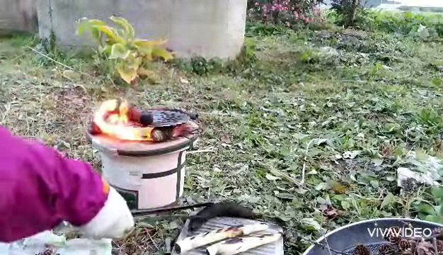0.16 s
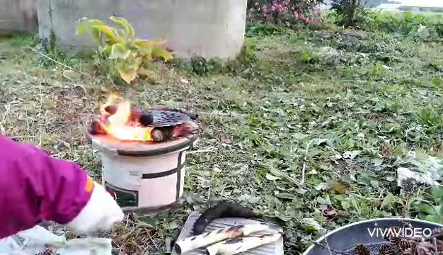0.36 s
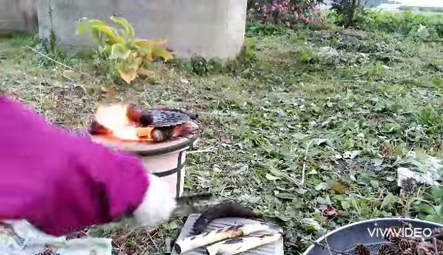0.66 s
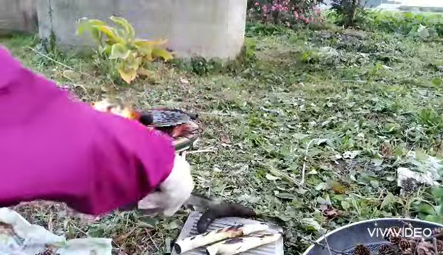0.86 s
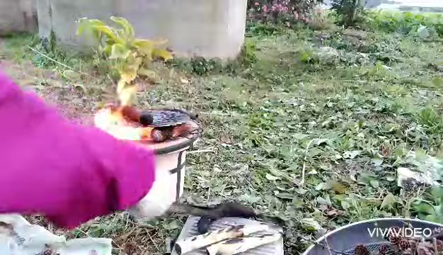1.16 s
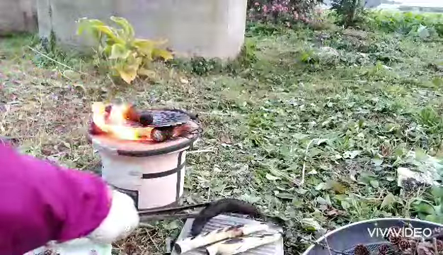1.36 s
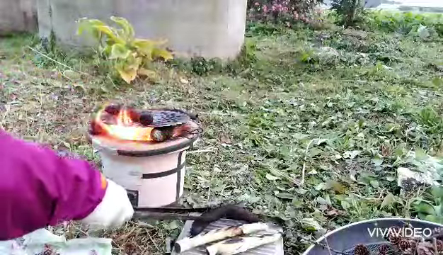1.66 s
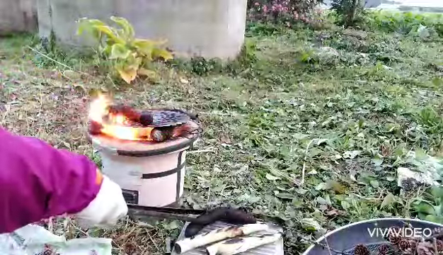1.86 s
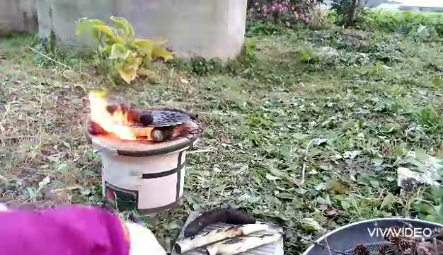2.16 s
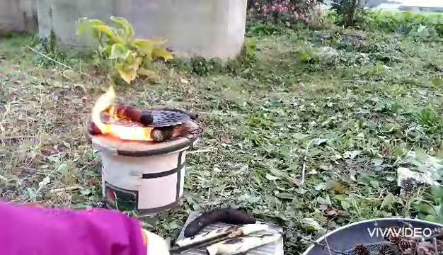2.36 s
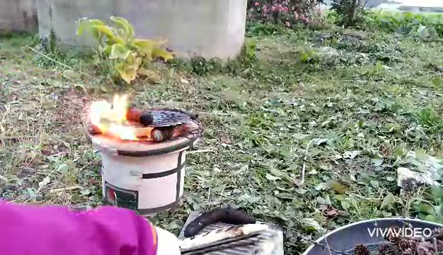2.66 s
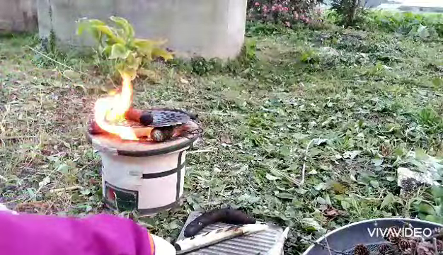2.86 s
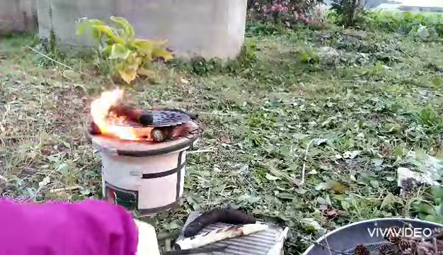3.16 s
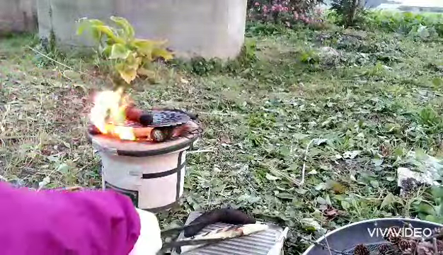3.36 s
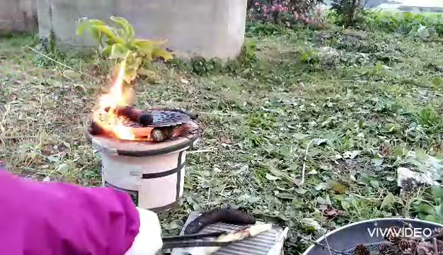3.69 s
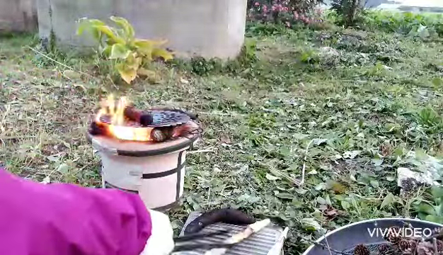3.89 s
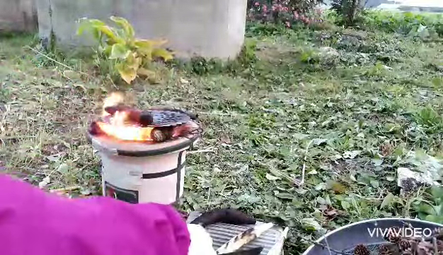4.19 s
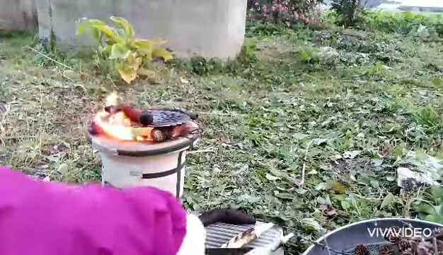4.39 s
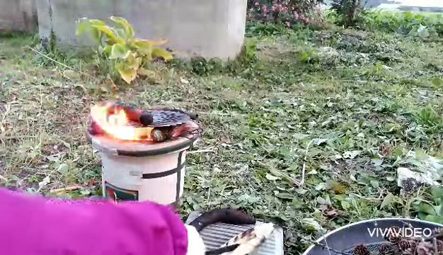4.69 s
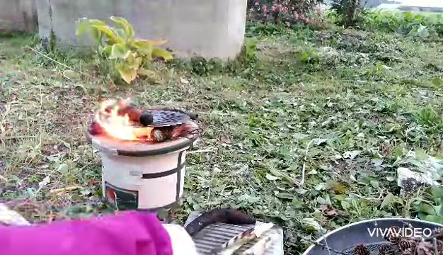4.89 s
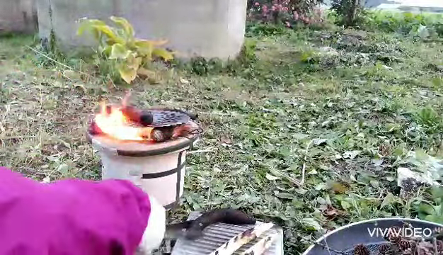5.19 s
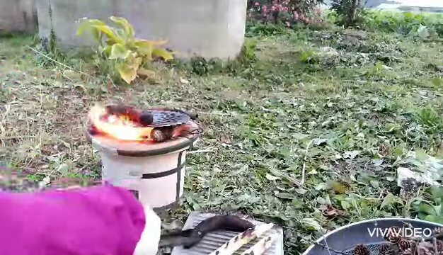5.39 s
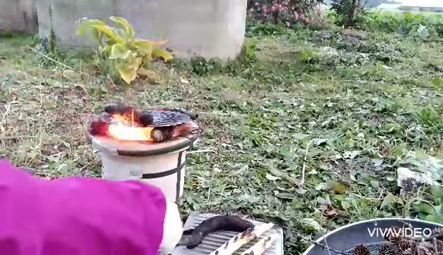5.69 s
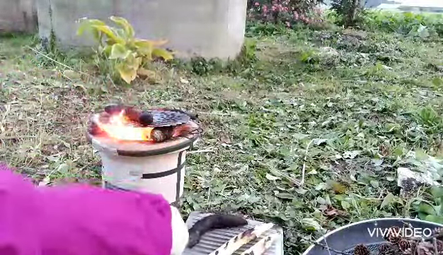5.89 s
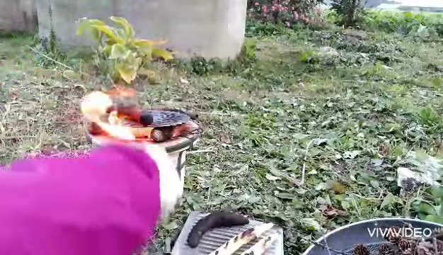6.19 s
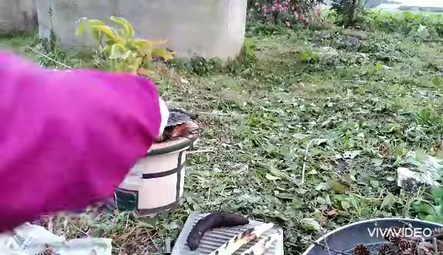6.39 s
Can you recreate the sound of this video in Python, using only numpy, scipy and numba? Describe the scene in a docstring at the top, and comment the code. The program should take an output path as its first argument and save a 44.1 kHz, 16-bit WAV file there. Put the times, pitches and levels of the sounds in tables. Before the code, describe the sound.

Outdoors in a garden, a nylon sleeve swishes as an arm moves, then steel tongs clink sharply. A cluster of rattling knocks and scrapes on a food-damped metal grate follows, then a bright double clink and the loudest clack near the middle. Smaller taps come later, with a last firm knock. Low flames flutter faintly and wood ticks. One phone microphone, close and dry, with dulled highest treble.

```python
"""Steel tongs turn food on a ridged metal grate in a garden, beside a small wood stove.
The tips knock, chatter and scrape on the grate, which the food damps; the arms clink: struck, decaying modes.
Shaped noise makes the low flames, the ticks of the wood and a nylon sleeve that swishes with each arm stroke.
A distant outdoor wash lies behind; one phone microphone hears it all through a limiter and a treble cut."""
import sys
import numpy as np
from scipy import signal
from scipy.fft import rfft, irfft, next_fast_len
from scipy.io import wavfile
from scipy.ndimage import uniform_filter1d, minimum_filter1d
from numba import njit

SR = 44100
rng = np.random.default_rng(int(sys.argv[2]) if len(sys.argv) > 2 else 0)


def pcm_store(signal):
    """Save signal as 16-bit PCM."""
    levels = np.round(np.clip(np.atleast_2d(signal), -1, 1) * 32767)
    wavfile.write(sys.argv[1], SR, levels.astype(np.int16).T)


N = 288458  # length in samples

# distant outdoor noise, relative spectrum: [f/Hz, density/dB per Hz]
GARDEN_SPECTRUM = [(200, -2), (320, -5), (600, -2.5), (930, 3.5), (1400, 1.5), (1800, -2.5), (2400, -12.5),
                   (3500, -19), (5300, -26.5), (6850, -17.5), (7800, -36), (11000, -44), (12300, -60.5)]
# low flutter of the flames, relative spectrum: [f/Hz, density/dB per Hz]
FLAME_SPECTRUM = [(20, -35), (33, -17), (45, -0.5), (58, 3), (80, 0.5), (108, -0.5), (140, -8), (200, -13),
                  (300, -19), (600, -79.5)]
# ticks of the burning wood: [t/s, peak level/dB]
WOOD_TICKS = [(2.268, -27), (4.5712, -33.5), (5.5595, -31.5), (6.1749, -36.5), (6.3579, -34)]
# nylon hiss, also the colour of the wood ticks, relative spectrum: [f/Hz, density/dB per Hz]
SWISH_SPECTRUM = [(500, -6), (900, -3), (1500, 1), (2100, -4), (3000, -4.5), (4000, -2.5), (5300, -4.5),
                  (6300, 1.5), (6900, 6), (7400, -8), (8000, -16.5), (9500, -23), (11200, -29),
                  (12300, -75)]
# strokes of the arm in its sleeve: [t of the fastest moment/s, length/s, level/dB]
ARM_STROKES = [(0.127, 0.48, -41), (0.469, 0.2, -40.5), (0.675, 0.18, -42), (0.892, 0.17, -48.5),
               (1.455, .24, -48.5), (1.694, 0.39, -46), (2.168, 0.31, -42), (2.702, 0.074, -54),
               (3.646, 0.089, -46.5), (3.86, 0.15, -51), (4.004, 0.26, -48), (4.243, 0.091, -50.5),
               (4.44, 0.3, -52), (4.64, .22, -53), (5.287, 0.18, -53), (5.52, 0.33, -51), (6.09, .15, -50),
               (6.48, 0.17, -52)]
# modes of the tongs: [f/Hz, level/dB, t60/s], before each blow's ring factor
TONGS_MODES = [(2452, -6.5, 0.041), (3150, 0.5, 0.044), (3280, -7, 0.019), (4000, -3, 0.035),
               (4330, -2, 0.034), (4890, -4.5, 0.05), (5810, -4, 0.059), (5865, -12.5, 0.0098),
               (5840, -19, .025), (6680, 6, 0.035), (7060, 4, 0.0065), (7170, -22.5, 0.13),
               (7560, -29, 0.032), (10400, -14, .02), (10700, -19, .03), (11250, -16, .035)]
# modes of the grate: [f/Hz, level/dB, t60/s], before each blow's ring factor
GRATE_MODES = [(345, -24, 0.085), (425.3, -16, 0.16), (451, -18, 0.082), (728.6, -8, 0.13),
               (894, -7.5, 0.12), (980, -7, 0.086), (1063, -3.5, 0.087), (1320, -16, 0.025),
               (1666, -4, 0.06), (1752, -6.5, 0.1), (1860, -11, 0.063), (2096, -4, 0.12), (2167, 2, 0.074),
               (2284, -13.5, 0.15), (3025, -10, 0.12), (3244, -7, 0.075), (3600, -7.5, 0.094),
               (3980, -7.5, 0.07), (4440, -9, 0.1), (4630, -8, 0.025), (4723, -5, 0.054),
               (5270, -8.5, 0.046), (5050, -20, 0.055), (5854, 0, 0.048), (6040, -20, 0.027),
               (6300, -8, 0.05), (6780, 3.5, 0.018), (6760, -1, 0.052), (7400, -19.5, .07),
               (8700, -27, 0.33)]
# arms against each other: [t/s, level/dB, brightness/dB per octave, ring/multiple of the modes' t60,
# chatter/s, first favoured f/Hz, second favoured f/Hz, boost/dB]
ARM_CLINKS = [(.252, -37, -3, 0.22, 0.00098, 6470, 6620, 7), (.4722, -11, 2, 0.39, 0.0025, 3270, 4000, 5),
              (.655, -34, -1, 2.6, .0015, 2452, 3230, 18),
              (2.775, -15.5, 3.5, 0.98, 0.00065, 3070, 6550, 4.3),
              (2.7892, -32, 14, .7, 0.00087, 3070, 6730, 6),
              (2.7998, -23.5, 6.5, .62, 0.00056, 3080, 7100, 9),
              (4.8696, -28.5, 0.5, 0.18, 0.00017, 2460, 6530, 9),
              (5.001, -33.5, 11, 0.95, 0.0041, 5730, 6020, 22)]
# tips on the grate: [t/s, level/dB, brightness/dB per octave, ring/multiple of the modes' t60,
# chatter/s, first favoured f/Hz, second favoured f/Hz, boost/dB]
TIP_KNOCKS = [(1.1549, -13.7, 0.0, 0.75, 0.008, 2140, 5800, 8),
              (1.1996, -17.5, -4, 0.57, 0.0028, 430, 873, 4),
              (1.2396, -13, 1.5, 0.16, 0.0068, 417, 3305, 13.5),
              (1.2742, -30, 4.5, 0.87, 0.0033, 1070, 2322, 14),
              (1.2835, -23.5, 0.5, 1.26, 0.0066, 1066, 2170, 5.3),
              (1.2931, -21, 1.5, 0.4, 0.00085, 4760, 5840, 9.5),
              (2.5105, -26.1, -2, 1.2, 0.022, 736, 3600, 8), (2.548, -41, 3, 0.82, 0.0093, 2326, 3640, 12),
              (2.568, -24.5, -3.5, 0.47, 0.0041, 1690, 6800, 4),
              (2.5725, -22.5, -2.5, 0.43, 0.003, 2149, 3305, 13),
              (2.8928, -6, 3.5, 0.41, 0.0055, 417, 3600, 8.2),
              (2.9053, -22.5, -0.5, 1.06, 0.00052, 1063, 3700, 7.8),
              (3.2512, -21.5, -2.5, 0.95, 0.003, 710, 1630, 8),
              (3.2542, -20, -1.5, 0.83, 0.0012, 882, 3270, 12.3),
              (3.349, -40, -2.5, 0.71, 0.0046, 730, 5890, 8.7),
              (3.6445, -32, -6, 0.43, 0.0015, 730, 873, 12),
              (3.7169, -41, 5.5, 0.74, 0.015, 2970, 5803, 8.6),
              (5.3141, -14.5, 1, 0.47, 0.00037, 950, 2200, 8.7),
              (5.319, -22.5, -2.5, 0.37, 0.001, 950, 2140, 3.7),
              (5.368, -35.5, -2.0, 1.4, 0.0066, 2322, 3025, 11),
              (5.379, -31.5, -3, 0.74, 0.0004, 890, 3000, 8.6),
              (5.398, -43.5, 10, 0.27, 0.0018, 4175, 4425, 4)]

GARDEN_DB, FLAME_DB = -45, -43  # rms levels that the slow swells vary
SPEED_POWER, REST_DB = 1, -59  # hiss grows with this power of arm speed; rustle between strokes, dB
TILT_FROM_HZ, TILT_TO_HZ = 450, 7000  # range over which a contact's hardness tilts its spectrum
TOP_HZ = 12100  # upper limit of the microphone channel


def undb(db):
    """Decibels to gain."""
    return 10 ** (np.asarray(db) / 20)


def unit(x):
    """Scale to rms 1."""
    return x / np.sqrt(np.mean(x ** 2) + 1e-20)


def add(out, start_s, x):
    """Mix x into out from start_s on."""
    i = int(start_s * SR)
    out[i:i + len(x)] += x[:N - i]


def walk(rate_hz):
    """Smooth random wander of rms 1, from random steps averaged twice."""
    hold = max(int(SR / rate_hz), 1)
    steps = np.repeat(rng.standard_normal(N // hold + 1), hold)
    smooth = uniform_filter1d(uniform_filter1d(steps, hold), hold)
    return unit(smooth[:N])


def colour(x, points):
    """Shape x by a spectrum of (Hz, dB) points and scale it to rms 1."""
    hz, db = np.transpose(points)
    size = next_fast_len(len(x))
    f = np.maximum(np.fft.rfftfreq(size, 1 / SR), 1)
    gain = undb(np.interp(np.log(f), np.log(hz), db))
    return unit(irfft(rfft(x, size) * gain, size)[:len(x)])


def butter(x, hz, kind, order=4):
    """Causal Butterworth filter."""
    sos = signal.butter(order, np.minimum(hz, SR * .45), kind, fs=SR, output="sos")
    return signal.sosfilt(sos, x)


def garden():
    """A distant wash of outdoor noise that swells a little."""
    wash = butter(colour(rng.standard_normal(N), GARDEN_SPECTRUM), 150, "high", order=2)
    swell_db = .5 * walk(1.5) + .5 * walk(14)
    return wash * undb(GARDEN_DB + swell_db)


def fire():
    """Flames flutter as low noise; the wood gives a few ticks and many tiny ones, brief decaying noise."""
    flutter = colour(rng.standard_normal(N), FLAME_SPECTRUM) * undb(FLAME_DB + 1.0 * walk(7.4))
    t = np.arange(SR // 50) / SR
    tiny = [(when * N / SR, -52 + 10 * size) for when, size in rng.random((40, 2))]
    ticks = np.zeros(N)
    for start_s, peak_db in list(WOOD_TICKS) + tiny:
        tick = colour(rng.standard_normal(len(t)), SWISH_SPECTRUM) * np.exp(-t / 0.0036)
        add(ticks, start_s, undb(peak_db) * tick / np.abs(tick).max())
    return flutter + ticks


def sleeve():
    """Nylon slides over itself in a fine, grainy hiss; in each stroke the arm speeds up and slows again."""
    t = np.arange(N) / SR
    loudness = undb(REST_DB + 2 * walk(4.88))
    for middle_s, length_s, db in ARM_STROKES:
        speed = np.cos(np.pi * np.clip((t - middle_s) / length_s, -.5, .5))
        loudness = np.hypot(loudness, undb(db) * speed ** SPEED_POWER)
    grains = rng.standard_normal(N) * undb(2.1 * walk(400) + 1.26 * walk(30))
    return colour(grains, SWISH_SPECTRUM) * loudness


def tilt_db(hz, brightness):
    """A hard contact tilts the spectrum up, a soft one down, by brightness dB per octave."""
    return brightness * np.log2(np.clip(hz, TILT_FROM_HZ, TILT_TO_HZ) / TILT_FROM_HZ)


def contact_force(t, chatter_s, rough):
    """One push, with random micro-bounces that die away over chatter_s."""
    touch = t[:SR // 20]
    bounces = rng.standard_normal(len(touch)) ** 3 * np.exp(-touch / chatter_s)
    force = rough * np.sqrt(chatter_s * SR) * bounces / np.linalg.norm(bounces)
    force[0] += 1
    return force


def blow(modes, brightness, ring, chatter_s, favoured_hz, favour_db, rough, edge_hz, air_db,
         crack_db, crack_t60, low_hz, scatter_db, detune, free_db, free_t60):
    """One contact: a push and its micro-bounces ring the modes, over a crack of dense short-lived ones."""
    t = np.arange(SR // 8) / SR
    hz, db, t60 = np.transpose(modes)[:, :, None]
    chance = rng.standard_normal((3, len(modes), 1))
    force = contact_force(t, chatter_s, rough)
    db = db + tilt_db(hz, brightness)
    # the spot that is struck favours the modes that move most there
    for spot_hz in favoured_hz:
        db = db + favour_db * np.exp(-(np.log(hz / spot_hz) / .03) ** 2)
    # the grip shifts each mode's pitch a little
    mode_hz = hz * (1 + detune * chance[0])
    swing = np.sign(chance[1]) * np.sin(2 * np.pi * mode_hz * t)
    # pressed metal dies fast; a faint free ring remains
    free = undb(free_db - 60 * t / (free_t60 * np.sqrt(ring)))
    pressed = undb(-60 * t / (t60 * ring))
    rings = undb(db + scatter_db * chance[2]) * (pressed + free) * swing
    crack_tilt = undb(tilt_db(np.fft.rfftfreq(len(t), 1 / SR), brightness))
    dense = irfft(rfft(rng.standard_normal(len(t))) * crack_tilt, len(t))
    crack_decay = undb(-60 * t / (crack_t60 * min(ring, 1))) + free / 2
    parts = np.vstack([rings, dense * undb(crack_db) * crack_decay])
    # the bounces spread each part's energy in time and leave its amount alone
    driven = signal.fftconvolve(parts, force[None], axes=-1)[:, :len(t)]
    share = np.linalg.norm(parts, axis=1) / np.linalg.norm(driven, axis=1)
    # small metal radiates little below low_hz
    body = butter(share @ driven, low_hz, "high", order=2)
    # the microphone falls steeply above edge_hz, so only faint air lies above it
    air = undb(air_db) * butter(body, 0.855 * TOP_HZ, "low", order=12)
    return butter(body, edge_hz, "low", order=16) + air


def strikes(table, modes, **contact):
    """Play a table of blows, each with the energy of its level held as rms over 20 ms."""
    out = np.zeros(N)
    for start_s, db, brightness, ring, chatter_s, first_hz, second_hz, favour_db in table:
        x = blow(modes, brightness, max(ring, .05), max(chatter_s, 1 / SR),
                 (first_hz, second_hz), favour_db, **contact)
        add(out, start_s, undb(db) * x * np.sqrt(SR / 50) / np.linalg.norm(x))
    return out


def tongs():
    """The hand-held arms clink, bright and short: a blow rings the modes of the steel."""
    return strikes(ARM_CLINKS, TONGS_MODES, rough=0.097, edge_hz=7770, air_db=-10, crack_db=0.5,
                   crack_t60=0.028, low_hz=70.2, scatter_db=0.0, detune=0.0022,
                   free_db=-29, free_t60=.11)


def grate():
    """The tips knock and skid on the loaded grate and ring its damped modes."""
    return strikes(TIP_KNOCKS, GRATE_MODES, rough=0.07, edge_hz=7280, air_db=-20, crack_db=2.0,
                   crack_t60=0.049, low_hz=533, scatter_db=2.5, detune=0.003,
                   free_db=-37.5, free_t60=0.27)


def scene():
    """Everything at one microphone."""
    return (garden() + fire() + sleeve() + tongs() + grate())[None]


@njit
def follow(x, attack, release):
    """Level of x, rising fast and falling slowly."""
    out, level = np.empty(len(x)), 0.
    for i in range(len(x)):
        level += (abs(x[i]) - level) * (attack if abs(x[i]) > level else release)
        out[i] = level
    return out


def record(dry):
    """The phone's limiter flattens the loudest blows, what slips through is clipped; the top is cut."""
    ceiling, attack_s, release_s = .65, .00015, .006
    level = follow(dry[0], 1 - np.exp(-1 / (attack_s * SR)), 1 - np.exp(-1 / (release_s * SR)))
    gain = np.minimum(1, ceiling / (level + 1e-9))
    # each dip in gain is widened, then smoothed, over 21 samples
    held = dry * uniform_filter1d(minimum_filter1d(gain, size=21), size=21)
    clipped = np.clip(held, -.78, .78)
    softened = butter(clipped, .93 * TOP_HZ, "low", order=14)
    return signal.sosfilt(signal.ellip(12, .2, 70, TOP_HZ, fs=SR, output="sos"), softened)


dry = scene()
out = record(dry)
pcm_store(out)
```